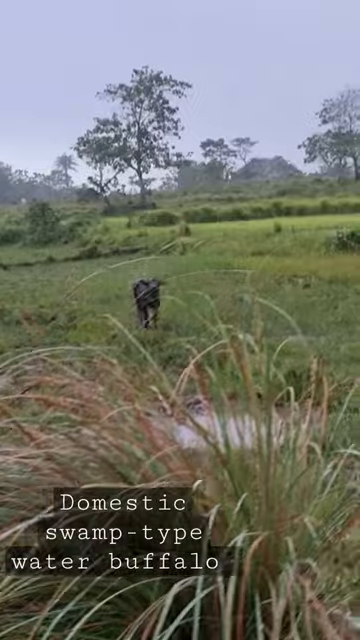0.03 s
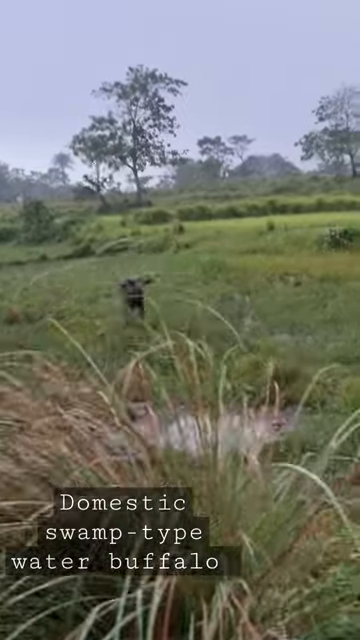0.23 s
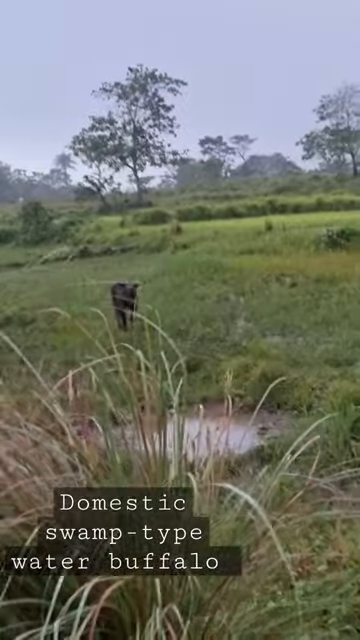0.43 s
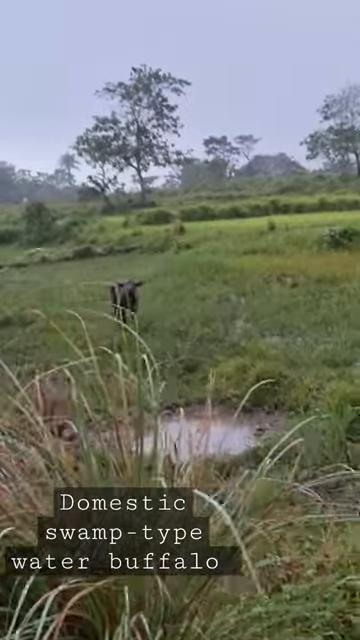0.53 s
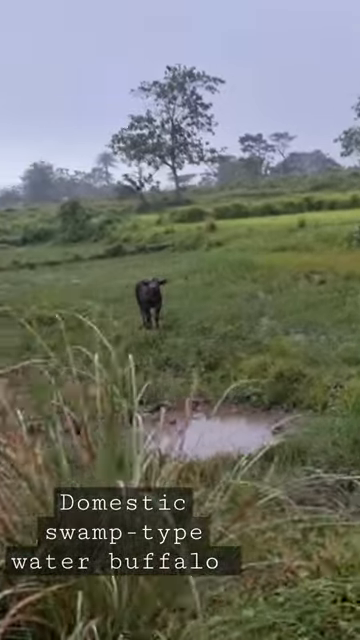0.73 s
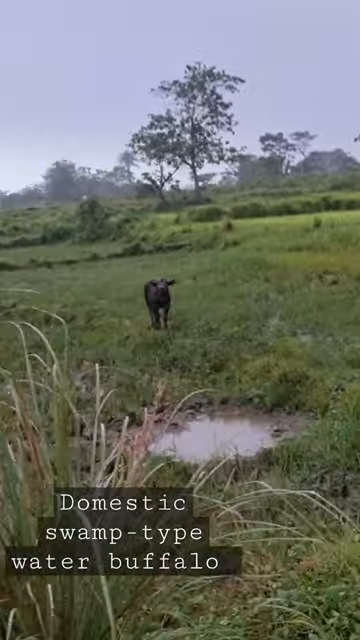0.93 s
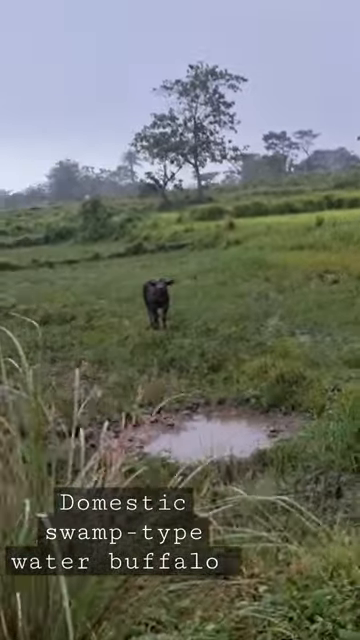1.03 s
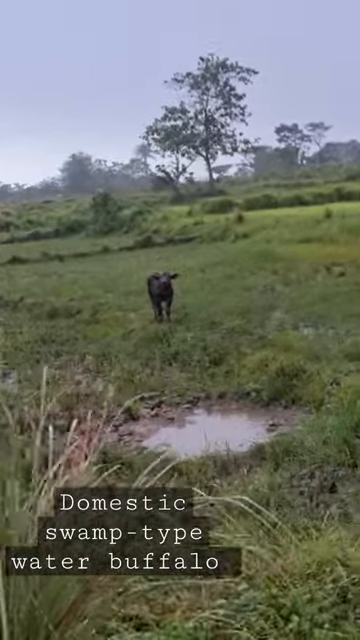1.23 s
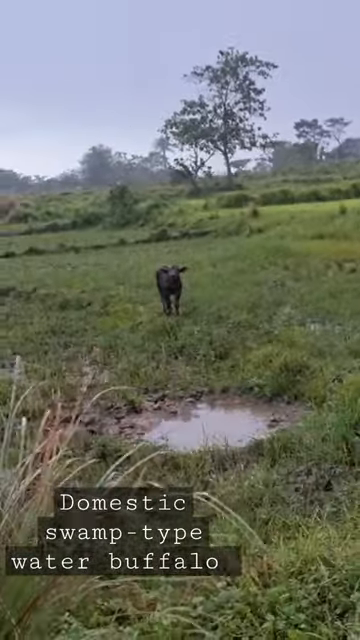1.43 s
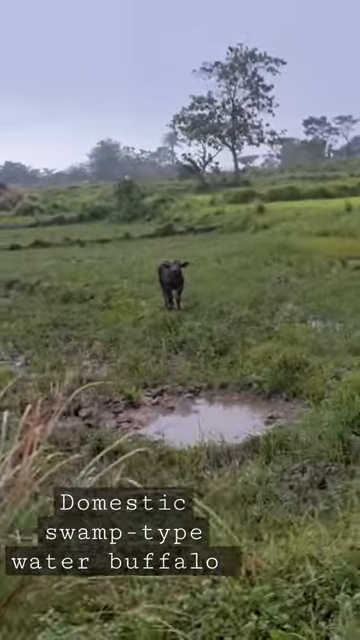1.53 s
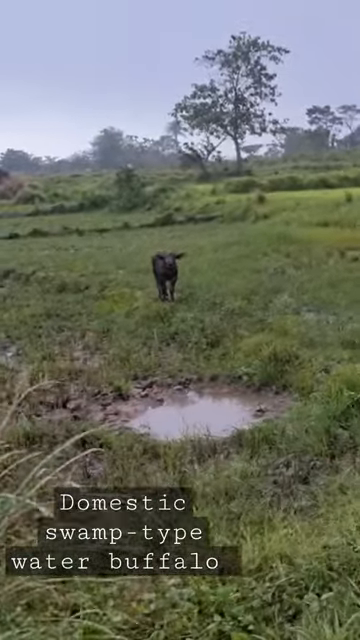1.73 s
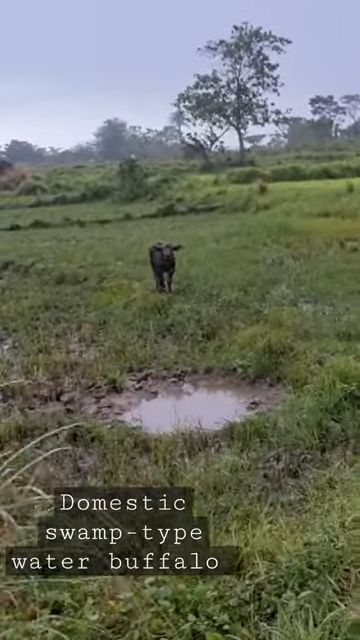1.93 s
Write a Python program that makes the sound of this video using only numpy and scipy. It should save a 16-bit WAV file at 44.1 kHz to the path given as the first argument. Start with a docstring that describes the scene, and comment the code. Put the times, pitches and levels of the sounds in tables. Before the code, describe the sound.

High-pitched cricket chirps in short bursts, with low wind buffeting, grass rustle and soft distant bird hoots

```python
"""A damp open field. Close crickets chirp in groups of three or four short pulses, each falling in pitch.
A higher cricket trills, a bush cricket buzzes and a far chorus throbs: all are tones or bands of noise.
A distant bird hoots with gliding tones. Grass rustles with shaped noise and clicks, and stems snap as
noise bursts. Wind rumbles on the microphone as low noise over a steady hush; a faint hum joins at the end."""
import sys
import numpy as np
from scipy import signal
from scipy.fft import rfft, irfft
from scipy.io import wavfile

SR = 44100
rng = np.random.default_rng(int(sys.argv[2]) if len(sys.argv) > 2 else 0)


def generate_wav(sig):
    """Save sig (samples, or channels by samples) to the path in sys.argv[1] as 16-bit PCM at SR."""
    pcm = np.round(np.clip(np.atleast_2d(sig).T, -1, 1) * 32767).astype(np.int16)
    wavfile.write(sys.argv[1], SR, pcm)


N = 88200
T = np.arange(N) / SR  # time of each sample, s
BIN_HZ = np.fft.rfftfreq(N, 1 / SR)

# Wind strength over time: time_s, level_db (before WIND_DB is added)
WIND_LEVEL = [(.16, -52), (.19, -50), (.22, -38), (.3, -39.5), (.39, -40.5), (.42, -37), (.47, -49),
              (.5, -34), (.555, -37), (.6, -48.5), (.69, -51), (.73, -39.5), (.85, -44.5), (1.0, -47),
              (1.1, -50.5), (1.3, -53), (1.47, -55), (1.53, -49.5), (1.57, -58), (1.68, -51), (1.76, -64),
              (1.87, -56), (2.0, -59)]
# Tone balance of the wind: pitch_hz, relative_db_per_hz
WIND_SPECTRUM = [(20, -12), (40, 1), (55, 2), (74, 3.5), (108, -4), (150, -17), (220, -25), (320, -41),
                 (600, -59)]
# Tone balance of the open-air hush: pitch_hz, relative_db_per_hz
AIR_SPECTRUM = [(150, 14), (300, 4.5), (500, -3.5), (800, 4), (1200, -5.5), (3000, -4.5), (6500, -15),
                (11000, -19.5), (15000, -17)]
WIND_DB, AIR_DB = 3.5, -64

# Strength of the faint hum over time: time_s, level_db
HUM_LEVEL = [(1.76, -107), (1.84, -70), (2.0, -66)]
HUM_HZ = 201.4

# Far insect bands: centre_hz, width_hz, level_db, throbs_per_s, throb_depth_db, right_ear_favour_db
CHORUS_BANDS = [(5457, 545, -66, 10, 3.5, 4.5), (4750, 790, -68.5, 9.7, -4.5, 5.5),
                (8234, 670, -67.5, 20, 0.85, -6.5), (8570, 970, -68.5, 28, 3, 2.5)]
CHORUS_SWELL_DB, CHORUS_SWELLS_PER_S = 1, 4.74

BUZZ_PER_S, BUZZ_HZ, BUZZ_DB, BUZZ_PAN_DB = 108, 9550, -63, 1
BUZZ_S, BUZZ_SAG_HZ_PER_S = 0.0019, 63000

# Rustle strength over time: time_s, level_db (before the rustle and crackle offsets)
RUSTLE_LEVEL = [(.17, -63.5), (.21, -73), (.28, -57), (.35, -60), (.45, -58.5), (.53, -87), (.69, -57.5),
                (.8, -69), (.92, -60.5), (.98, -55.5), (1.04, -60.5), (1.15, -66.5), (1.5, -65), (1.7, -57),
                (1.8, -62.5), (2.0, -68.5)]
# Tone balance of rubbing grass: pitch_hz, relative_db_per_hz
RUSTLE_SPECTRUM = [(200, -41), (400, -2.5), (520, -9), (900, -3), (2350, -3), (4000, -5), (6500, -8),
                   (11000, -10), (15000, -15)]
# Stems snapping and knocking: start_s, level_db, centre_hz, width_octaves, decay_s
SNAPS = [(0.229, -47, 152, 0.65, 0.028), (.220, -54, 610, 0.66, 0.0073), (0.223, -52, 1350, 0.49, 0.01),
         (.222, -55, 3770, 0.73, 0.015), (0.263, -50.5, 3370, 0.6, 0.0034),
         (0.284, -54.5, 2200, 1.5, 0.017), (.349, -48, 3970, 1, 0.0017), (.388, -54, 2330, 0.67, .004),
         (0.441, -60, 2020, 0.87, 0.024), (0.711, -43.5, 2780, 1.5, .0013), (0.744, -56, 237, 0.6, 0.027),
         (.840, -43.5, 2500, 1.28, 0.0026), (.839, -56, 790, 0.67, 0.01), (0.971, -58.5, 1520, 0.84, 0.012),
         (1.069, -48.5, 2120, 0.46, 0.0033), (1.54, -51, 3080, 2.1, 0.0028), (1.745, -55, 11000, 0.6, .003),
         (1.778, -52.5, 2040, 1.4, .002)]
RUSTLE_DB, RUSTLE_FLICKER_DB, RUSTLE_PAN_DB = -4, 1.5, 4
CRACKLES_PER_S, CRACKLE_DB, CRACKLE_SPREAD_DB, CRACKLE_LIMIT_DB = 700, -7.5, 7.5, 14.5

# Bird hoots: start_s, length_s, pitch_hz, level_db, closing_flip_hz (negative flips down)
HOOTS = [(0.299, 0.044, 411, -65, 5), (0.893, 0.052, 445, -63.5, 2), (0.992, 0.085, 600, -50.5, -7),
         (1.218, 0.056, 660, -47, 2), (1.45, 0.08, 640, -48.5, 85.5), (1.679, 0.067, 628, -48.5, 121),
         (1.896, 0.07, 626, -48, 114)]
HOOT_RISE_HZ, FLIP_DB_PER_HZ = 70, -0.07
FLIP_AT = 0.564  # share of the hoot's length
HOOT_PAN_DB, HOOT_LAG_MS, HOOT_ECHO_DB = 6, 0.54, -9

# Trills of the higher cricket: first_pulse_s, pulses, level_db
TRILLS = [(0.358, 5, -54), (0.741, 4, -59), (0.847, 3, -66), (1.047, 4, -56.5), (1.144, 4, -63.5),
          (1.342, 4, -59), (1.588, 8, -60.5)]
TRILL_GAP_S, TRILL_HZ, TRILL_SAG_HZ_PER_S = .0245, 7500, 68000
TRILL_SWELL_S, TRILL_FALL_S, TRILL_SCATTER_DB = .004, .0048, -6

# Close chirps: last_pulse_s, pulses, pitch_hz, level_db, pulse_swell_s, left_ear_lag_ms,
# ground_reflection_share
CHIRPS = [(.2475, 3, 4670, -48, 0.0065, 0.14, 1), (.500, 3, 4660, -45.5, 0.0075, 0.16, 0.78),
          (0.79, 3, 4530, -46, .008, 0.161, 0.93), (1.001, 4, 4942, -33.5, 0.0048, 0.15, .05),
          (1.0452, 3, 4440, -49.5, 0.005, 0.17, 0.43), (1.2122, 3, 4938, -34, 0.005, 0.16, 0.055),
          (1.4468, 3, 4924, -33.5, 0.0042, 0.15, 0.041), (1.7181, 3, 4917, -36.5, 0.0048, 0.15, 0.029),
          (1.911, 3, 4620, -47.5, 0.0049, 0.16, 0.13)]
PULSE_GAP_S, PULSE_FALL_S, SAG_HZ_PER_S = .034, .0051, 53000
WARM_UP_DB, REFLECTION_MS = 1.0, 1.76
STROKE_ROUGH, STROKE_FLUTTER_DB = .09, -26  # slower and fast random flutter of the strokes' loudness
CRICKET_PAN_DB, SCATTER_DB, SCATTER_T60_S = 5, -10, .09

START_S, FADE_IN_S, CUTOFF_HZ = .159, .002, 15300


def from_db(db):
    """Turn decibels into a gain."""
    return 10 ** (np.asarray(db) / 20)


def rms_one(x):
    """Scale a sound to an average strength (rms) of 1."""
    return x / np.sqrt(np.mean(x ** 2) + 1e-20)


def noise():
    """Separate hiss for each ear."""
    return rng.standard_normal((2, N))


def curve(rows):
    """Gain over time, joining (time_s, level_db) rows with straight lines in dB."""
    return from_db(np.interp(T, *np.transpose(rows)))


def band(x, low_hz, high_hz, order=2):
    """Keep mainly the pitches between two limits."""
    edges = np.clip([low_hz, high_hz], 10, SR / 2 - 100)
    return signal.sosfilt(signal.butter(order, edges, "band", fs=SR, output="sos"), x)


def colour(x, spectrum):
    """Give a sound a tone balance, fading out below its lowest point; rms 1."""
    hz, db = np.transpose(spectrum)
    bins = np.maximum(BIN_HZ, 1)
    gain = from_db(np.interp(np.log(bins), np.log(hz), db))
    low_fade = np.minimum(bins / hz[0], 1)
    return rms_one(irfft(rfft(x) * gain * low_fade, N))


def drift(rate_hz):
    """Smooth random wander with rms 1; a higher rate wanders faster."""
    spectrum = rfft(rng.standard_normal(N))
    return rms_one(irfft(spectrum * np.exp(-(BIN_HZ / rate_hz) ** 2), N))


def pan(x, right_db):
    """Make the right ear louder than the left by so many dB."""
    return x * from_db([[-right_db / 2], [right_db / 2]])


def ears(x, lag_ms):
    """Sound reaches the left ear later than the right."""
    delay = np.exp(-2j * np.pi * BIN_HZ * lag_ms / 1000)
    return np.array([irfft(rfft(x) * delay, N), x])


def scatter(x, t60):
    """Many random reflections, different in each ear, that die by 60 dB in t60 seconds."""
    tail = noise() * np.exp(-np.log(1000) * T / t60)
    return signal.fftconvolve(x, rms_one(tail) / np.sqrt(N), axes=1)[:, :N]


def wind():
    """Eddies at each microphone port make low, uneven noise, over the steady hush of open air."""
    eddies = from_db(WIND_DB) * curve(WIND_LEVEL) * colour(noise(), WIND_SPECTRUM)
    hush = from_db(AIR_DB) * colour(noise(), AIR_SPECTRUM)
    return eddies + hush


def hum():
    """A faint low tone with a slightly wandering pitch comes in at the end."""
    pitch = HUM_HZ + 3 * drift(10.7)
    return curve(HUM_LEVEL) * np.sin(2 * np.pi * np.cumsum(pitch) / SR)


def chorus():
    """Many far insects blur into throbbing bands of noise; the first band also swells more slowly."""
    out = 0
    for k, (hz, width, db, rate, depth_db, pan_db) in enumerate(CHORUS_BANDS):
        throb_db = depth_db * np.sin(2 * np.pi * rate * T + 1.17 * drift(3.8))
        swell = np.sin(2 * np.pi * CHORUS_SWELLS_PER_S * T + drift(0.67))
        swell_db = CHORUS_SWELL_DB * swell * (k == 0)
        voices = rms_one(band(noise(), hz - width / 2, hz + width / 2))
        out = out + pan(voices, pan_db) * from_db(db + throb_db + swell_db)
    return out


def stroke(s, hz, swell_s, fall_s, sag):
    """One wing closure: a tone that swells and stops, falling in pitch as the scraper slows."""
    out = np.zeros(N)
    near = np.abs(T - s) < 3 * max(swell_s, fall_s)
    t = T[near] - s
    loudness = np.exp(-(t / np.where(t < 0, swell_s, fall_s)) ** 2)
    cycles = hz * t - sag * t * t / 2 + rng.random()  # random starting point in the wave
    out[near] = loudness * np.sin(2 * np.pi * cycles)
    return out


def bush_cricket():
    """Very short, evenly timed wing strokes run together into an unbroken buzz."""
    buzz = 0
    for s in np.arange(0, N / SR, 1 / BUZZ_PER_S):
        hz = BUZZ_HZ + rng.normal(0, 70)
        buzz = buzz + stroke(s, hz, BUZZ_S, BUZZ_S, BUZZ_SAG_HZ_PER_S)
    return from_db(BUZZ_DB) * pan(ears(buzz, lag_ms=0.023), BUZZ_PAN_DB)


def crackle():
    """Random clicks of many sizes, each ringing in one of ten narrow bands."""
    sizes_db = np.minimum(CRACKLE_SPREAD_DB * rng.exponential(1, N), CRACKLE_LIMIT_DB)
    clicks = (rng.random(N) < CRACKLES_PER_S / SR) * from_db(sizes_db) * noise()
    band_number = rng.integers(0, 10, N)
    blades = 0
    for k, hz in enumerate(np.geomspace(600, 6000, 10)):
        blades = blades + band(clicks * (band_number == k), hz / 1.08, hz * 1.085)
    return colour(blades, RUSTLE_SPECTRUM)


def stem_snaps():
    """Each snap or knock is a band of noise that starts at once and dies away."""
    out = 0
    for s, db, hz, octaves, decay_s in SNAPS:
        burst = (T >= s) * np.exp(-np.abs(T - s) / decay_s)
        half_width = 2 ** (octaves / 2)
        sound = rms_one(band(noise(), hz / half_width, hz * half_width))
        out = out + from_db(db) * burst * sound
    return out


def grass():
    """Blades rub as flickering noise and crackle; now and then a stem snaps."""
    rubbing = from_db(RUSTLE_DB) * colour(noise(), RUSTLE_SPECTRUM)
    rustle = curve(RUSTLE_LEVEL) * (rubbing + from_db(CRACKLE_DB) * crackle())
    rustle = rustle * from_db(RUSTLE_FLICKER_DB * drift(30))
    return pan(rustle + stem_snaps(), RUSTLE_PAN_DB)


def hoot(s, length_s, hz, flip_hz):
    """A soft rising tone whose end shifts in pitch and weakens with the size of the shift."""
    progress = np.clip((T - s) / length_s, 0, 1)
    flip = flip_hz * (1 + np.tanh(20 * (progress - FLIP_AT))) / 2
    pitch = hz + HOOT_RISE_HZ * (progress - .5) + flip + 6 * drift(66)
    loudness = np.abs(np.sin(np.pi * progress)) * from_db(FLIP_DB_PER_HZ * np.abs(flip))
    return loudness * np.sin(2 * np.pi * np.cumsum(pitch) / SR)


def bird():
    """A run of hoots, faintly echoed by the field."""
    hoots = sum(from_db(db) * hoot(s, length, hz, flip_hz) for s, length, hz, db, flip_hz in HOOTS)
    hoots = pan(ears(hoots, HOOT_LAG_MS), HOOT_PAN_DB)
    return hoots + from_db(HOOT_ECHO_DB) * scatter(hoots, t60=0.17)


def high_cricket():
    """Quicker, higher wing strokes of uneven strength, from deeper in the grass."""
    trills = 0
    for s, pulses, db in TRILLS:
        for k in range(round(pulses)):
            pulse = stroke(s + k * TRILL_GAP_S, TRILL_HZ, TRILL_SWELL_S, TRILL_FALL_S, TRILL_SAG_HZ_PER_S)
            trills = trills + from_db(db + rng.normal(0, 2.0)) * pulse
    trills = ears(trills, lag_ms=0.033)
    return trills + from_db(TRILL_SCATTER_DB) * scatter(trills, t60=0.12)


def crickets():
    """Chirps of slightly rough strokes that grow stronger; a ground reflection notches their pitch glide."""
    out = 0
    for s, pulses, hz, db, swell_s, lag_ms, share in CHIRPS:
        chirp = 0
        for k in range(round(pulses)):  # counted back from the last, strongest pulse
            pulse = stroke(s - k * PULSE_GAP_S, hz, swell_s, PULSE_FALL_S, SAG_HZ_PER_S)
            chirp = chirp + from_db(db - WARM_UP_DB * k * k) * pulse
        reflection = share * np.interp(T - REFLECTION_MS / 1000, T, chirp)
        out = out + ears(chirp + reflection, lag_ms)
    out = out * (1 + STROKE_ROUGH * drift(350) + from_db(STROKE_FLUTTER_DB) * drift(4500))
    return pan(out, CRICKET_PAN_DB) + from_db(SCATTER_DB) * scatter(out, SCATTER_T60_S)


def scene():
    """Add all the layers, from the background to the close crickets."""
    background = wind() + hum() + chorus() + bush_cricket()
    return background + grass() + bird() + high_cricket() + crickets()


def record(dry):
    """Sound fades in quickly after a moment of silence; the highest pitches are cut."""
    fade_in = np.clip((T - START_S) / FADE_IN_S, 0, 1)
    top_cut = signal.ellip(10, .2, 80, CUTOFF_HZ, fs=SR, output="sos")
    return signal.sosfilt(top_cut, dry * fade_in)


dry = scene()
out = record(dry)
generate_wav(out)
```